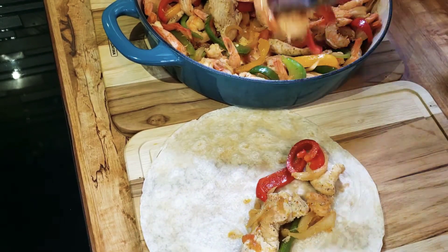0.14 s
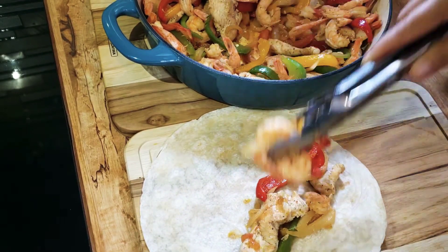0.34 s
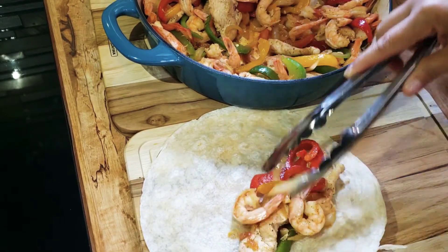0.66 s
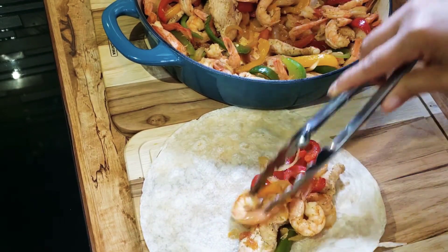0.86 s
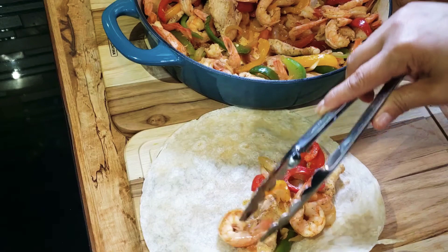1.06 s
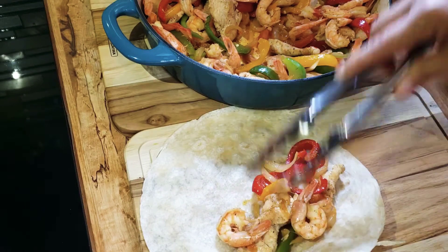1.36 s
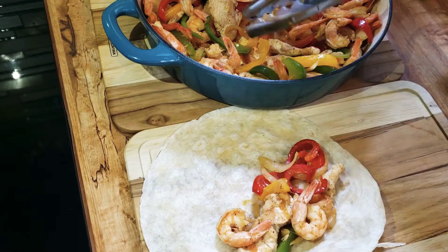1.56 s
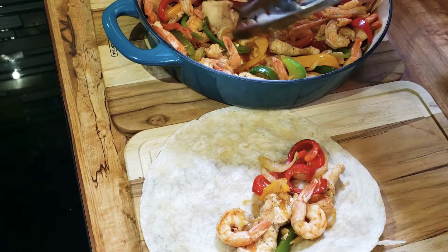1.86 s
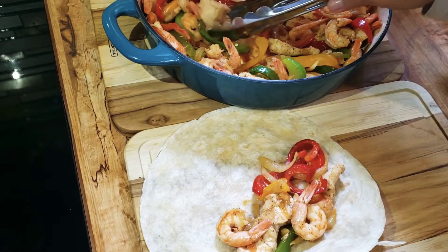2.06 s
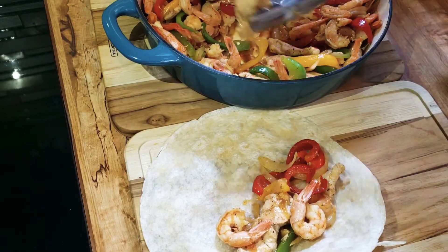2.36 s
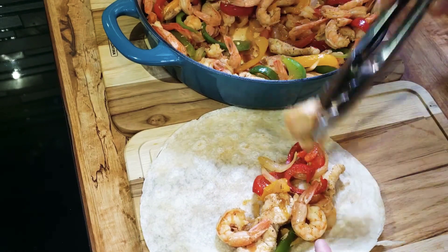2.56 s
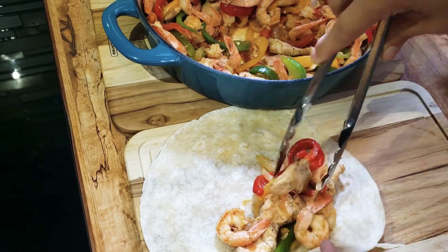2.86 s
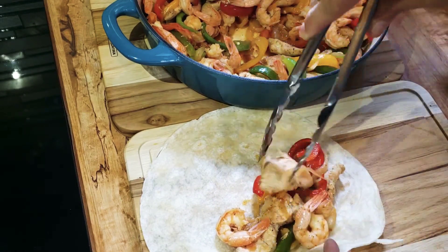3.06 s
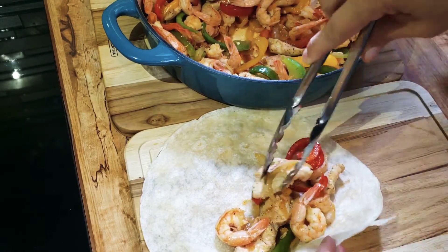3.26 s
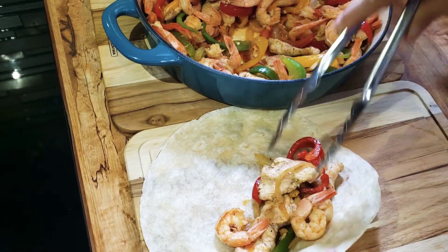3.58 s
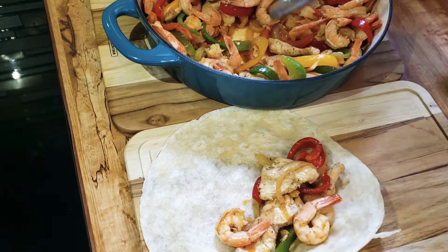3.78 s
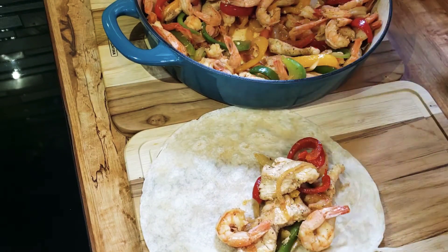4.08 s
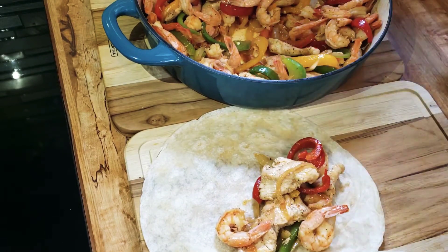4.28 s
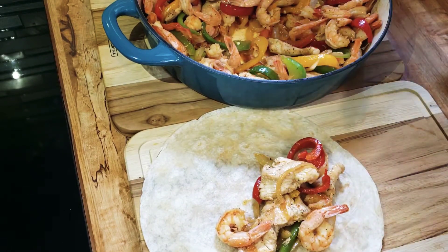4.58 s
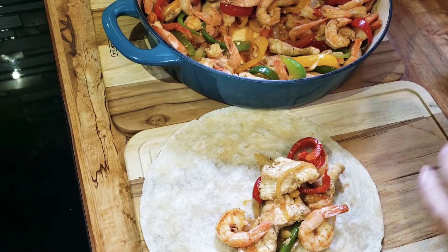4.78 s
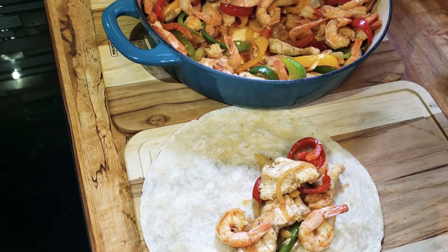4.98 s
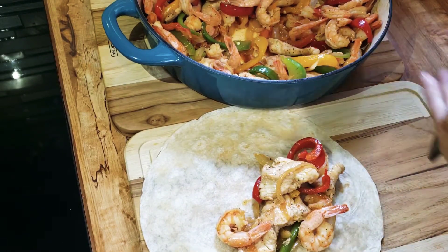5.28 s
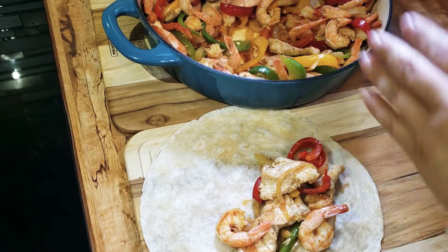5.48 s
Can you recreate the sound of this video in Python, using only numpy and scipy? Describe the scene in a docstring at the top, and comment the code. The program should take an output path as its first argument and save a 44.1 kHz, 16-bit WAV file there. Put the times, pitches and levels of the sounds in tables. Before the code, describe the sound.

Metal serving tongs in a quiet home kitchen. A tight click near 0.6 seconds, faint taps around one, two and three seconds, then from four seconds a loud bright clatter as the tongs are put down, with rattles continuing to the end. Low appliance rumble and slight hiss underneath. Close stereo microphone, steel louder on the right, short room tail.

```python
"""Quiet kitchen: steel tongs click, rattle and are laid down, louder on the right. Steel: decaying modes plus
shaped noise, repeated by random rebounds; echoes add a short tail. Pats and knocks: band-limited noise bursts,
faint or strong: soft pats of food, dull knocks of the board. Background: rumble and hiss from random spectra,
motor tones from wavering sines. Gain control ducks everything after loud clicks."""
import sys
import numpy as np
from scipy import signal
from scipy.fft import rfft, irfft
from scipy.io import wavfile
from scipy.ndimage import uniform_filter1d

SR = 44100
rng = np.random.default_rng(int(sys.argv[2]) if len(sys.argv) > 2 else 0)


def to_wav(sig):
    """Store sig (one row per channel, or 1-D mono) as 16-bit WAV at the path in sys.argv[1].

    Samples outside -1..1 are clipped; the rate is SR.
    """
    pcm = np.clip(np.atleast_2d(sig), -1, 1) * 32767
    pcm = np.round(pcm).astype(np.int16)
    wavfile.write(sys.argv[1], SR, pcm.T)  # frames by channels


N = 248724

# Rumble and hiss spectrum: f/Hz, relative density/dB
AIR_SPECTRUM = [(15, -26), (30, -17.5), (75, -7.5), (88, -6.5), (105, -17), (180, -14.5), (230, -24.5),
                (330, -17.5), (390, -12), (450, -19), (560, -21), (1150, -34), (2660, -35), (7500, -39),
                (13000, -34), (15800, -30.5), (16000, -73)]
# Left-right likeness of the air: f/Hz, correlation (clipped to +-1)
AIR_LIKENESS = [(60, 0.53), (130, 0.5), (290, 0.8), (640, 0.21), (1410, -0.2), (3100, 0.1), (6820, 0),
                (15000, -0.8)]
# Balance of the air: f/Hz, left minus right/dB
AIR_BALANCE = [(60, -8), (110, -1.5), (200, -8), (380, -9.5), (700, -6), (1290, -0.5), (2380, -0.5),
               (4400, 0.5), (8120, 0.0), (15000, -5.5)]
# Chance unevenness of the low rumble noise: t/s, gain/dB (full at 0 Hz, fading upward)
RUMBLE_UNEVENNESS = [(0, -2.7), (.5, -.5), (1, 0.1), (1.5, 4.5), (2, -1.4), (2.5, 2.5), (2.85, 1.2),
                     (3.3, 1.5), (3.8, 0), (4.3, 0.8), (4.8, -2.5), (5.2, -2), (5.64, 3.5)]
# Steady appliance tones: f/Hz, level before waver/dB rms, left minus right/dB, left lead/rad
HUM_TONES = [(58.7, -69, -3, 0.081), (82.5, -62.5, -4, .1), (237.6, -86, -4.5, .3), (269, -88, -3.5, 1),
             (2600, -96, -1, .1)]
# One tone that comes and goes: t/s, level before waver/dB rms
WHINE_LEVEL = [(0.0, -79), (0.14, -74.5), (0.74, -84), (1.96, -70), (3.08, -81.5), (3.12, -91), (3.19, -76),
               (4.08, -76), (4.18, -81), (5.04, -87.5), (5.2, -76), (5.64, -76)]
# Short broad noise bursts, faint or strong: pats of food and dull knocks of the board under the tongs: t/s,
# drive/dB, centre f/Hz, half width/octaves, rise/s
PATS_AND_KNOCKS = [(.168, -59, 11500, 0.22, .004), (.3, -63.5, 4300, 0.42, .03), (.72, -56, 5300, 0.42, 0.033),
                   (1.06, -61, 5000, 0.74, 0.043), (1.619, -62.5, 4500, 0.28, 0.023),
                   (2.06, -57, 5500, .2, .015), (2.13, -59, 5500, 0.63, 0.054), (2.18, -72, 6000, .4, 0.0074),
                   (2.4, -61, 5000, 0.66, .006), (2.5, -61, 4500, 0.34, 0.025), (2.76, -50, 1200, 1, 0.015),
                   (2.769, -57.5, 12100, 0.35, 0.018), (2.78, -56.5, 5500, 0.38, 0.013),
                   (3.05, -60, 4500, 0.59, 0.026), (3.38, -60.5, 4500, 0.42, 0.023),
                   (3.66, -58.5, 5000, .3, .02), (3.82, -57, 5450, .3, 0.024), (4.208, -40, 925.9, 0.56, 0.011),
                   (4.28, -45, 900, 0.63, 0.0078), (4.7, -47, 1400, 1, .012), (5.18, -40.5, 4860, 0.62, 0.046),
                   (4.5, -67, 925.9, 0.54, 0.015), (5.352, -33, 7900, 0.98, 0.01),
                   (5.46, -36.5, 2530, 0.21, 0.016), (5.61, -52, 6000, 0.59, .02)]
# Kitchen decay: f/Hz, t60/s
KITCHEN_T60 = [(1500, 0.3), (3000, 0.28), (6000, 0.23), (9000, 0.16), (12000, 0.19), (15700, 0.046),
               (16100, .03)]
# Touches of the tongs: t/s, drive/dB, tips/dB, hinge end/dB, knock of the thing touched/dB,
# low mode woken most f/Hz, high mode woken most f/Hz, left minus right before shadow/dB,
# fizz fade/(dB per 10 ms), rebounds at t = 0/dB
TOUCHES = [(0.6252, -30.5, -13, -34, -45, 6650, 12400, -4.0, 7, -12),
           (0.6323, -27.5, -14.5, -35.5, -39, 6500, 12100, -9, 10, -7.5),
           (0.6495, -29, -16, -29.5, -38, 6400, 12000, -6, 8.4, -2),
           (0.775, -53, -22, -20, -28, 6230, 14300, -8, 7, -5),
           (0.8, -55.5, -21, -19, -27, 6490, 12400, -7, 7, -7),
           (1.0302, -50.5, -14, -19, -23.5, 6600, 13300, -10, 3.6, 6.5),
           (1.039, -44.5, -14, -27, -25, 4480, 11300, -11, 3.4, -7),
           (1.209, -45, -24, -39, -39, 4500, 9630, -10, 3.1, -5),
           (2.0971, -40.5, -22.5, -41, -42, 6300, 11400, -8, 3.9, -10),
           (2.1197, -61, -7, -25, -19, 6800, 10600, -15, 5.4, 0),
           (2.2811, -47, -11, -27, -26, 6200, 11700, -14, 4.6, 0),
           (2.289, -39.5, -9.5, -26, -26, 4930, 12200, -11, 3.7, 0.5),
           (2.3112, -36, -13.5, -21.5, -26, 6400, 11800, -7.5, 8.8, -11),
           (2.951, -40, -10, -28, -30.5, 5900, 11200, -11.5, 7, -3),
           (2.9712, -49.5, -11, -20, -22, 4840, 11900, -14, 4.9, 2),
           (3.6312, -53, -6, -23, -34, 4700, 9820, -7.5, 4.5, -2),
           (3.8993, -53.5, -12, -29, -28, 5590, 11300, -10, 3.4, -4),
           (4.0036, -24.5, -10.5, -31, -40, 4320, 11400, -8.5, 7.3, -1.5),
           (4.0267, -54, -15, -11, -35, 4520, 11400, -7, 7, -9),
           (4.1095, -31.5, -19.5, -35, -42, 4100, 10400, -9, 5.6, -16),
           (4.1625, -46.5, -19.5, -29, -46, 6000, 11500, -7.0, 3.6, 8),
           (4.2096, -14, -6.5, -20, -64, 4730, 11800, -10, 8.1, -12),
           (4.2122, -16, -13, -23, -43, 5940, 11800, -7.5, 9.6, -7),
           (4.2215, -20.5, -3, -29, -45, 4700, 11800, -10, 10, -14),
           (4.2767, -19, -6.5, -32, -44, 4660, 11300, -7.5, 11.4, -10),
           (4.2868, -45, -20, -27, -39, 4840, 11300, -12, 7, -13),
           (4.343, -25.5, -14.5, -35, -46, 5730, 11400, -8, 8.3, -12),
           (4.4066, -31, -7.5, -36, -37, 4370, 11800, -5, 4.2, -7),
           (4.4186, -36, -8.5, -29, -43, 4310, 11300, -18.5, 4.6, -9.5),
           (4.4315, -31.5, -9, -19, -37, 4350, 11900, -10, 2.7, 7.5),
           (4.4495, -23.5, -10, -28, -38, 6300, 11900, -9.5, 7, -11.5),
           (4.464, -35, -15.5, -23, -36, 4410, 11400, -13, 7.6, 1),
           (4.546, -24.5, -8.5, -31, -62, 6620, 10400, -10.5, 9, -16.5),
           (4.549, -26, -15, -26, -49, 6500, 11300, -13, 7, -21),
           (4.575, -34.5, -13.5, -25, -38, 6430, 11300, -10.5, 2.6, -13),
           (4.6626, -38.5, -4, -34, -53, 6140, 11600, -10.5, 2.7, -7),
           (4.6961, -24.5, -1.5, -47, -61, 5730, 11500, -15, 15, -14),
           (4.7015, -26, -1.5, -36, -42, 5360, 11500, -10.5, 4.4, -11),
           (4.7213, -23, -11.5, -23.5, -41, 6530, 11700, -6.5, 12, -7),
           (5.0533, -35, -12.5, -37, -42, 6790, 11500, -8.5, 3.6, -1.5),
           (5.1006, -38, -14, -25, -40, 5940, 11500, -14, 5.5, -13),
           (5.1074, -28.5, -13.5, -34, -41, 6100, 11200, -3.5, 9.3, -10),
           (5.1143, -38.5, -6, -37, -45, 6010, 11300, -8, 7, -17),
           (5.1679, -29.5, -5, -28, -53, 6020, 11500, -8.5, 5.5, -3),
           (5.218, -37, -7, -42, -48, 3990, 12700, -8, 3.5, -13),
           (5.2425, -33, -7.5, -28, -46, 7350, 14300, -10.5, 3.9, -8),
           (5.252, -25.5, -3.5, -35, -30.5, 7150, 11500, -6.0, 8.4, -13),
           (5.3644, -26.5, -8, -37, -37, 6080, 11300, -10, 8.1, -4),
           (5.3698, -27.5, -16, -27, -37, 6270, 11500, -13.5, 7.4, -4),
           (5.462, -18.5, -13, -29, -36.5, 6300, 11300, -9, 12.4, -9),
           (5.4711, -22.5, -16.5, -24, -40, 5330, 11700, -1.5, 7.9, -6)]
# Modes of the steel arms: f/Hz, level before scatter/dB, t60 before hand damping/s
STEEL_MODES = [(2190, 2, 0.053), (3176, 5.5, 0.068), (3754, 6, 0.15), (4300, 9, 0.057), (4750, 2, 0.099),
               (4780, 0, 0.07), (5280, 3, 0.074), (5873, 3, 0.054), (6000, -11, 0.11), (6570, 1.5, 0.047),
               (6910, -1.5, 0.075), (7530, -2.5, 0.066), (7630, 0.5, 0.27), (7560, -7, 0.034),
               (8550, -3, 0.096), (9270, -3.5, 0.034), (10270, 3, 0.21), (11020, 1, .09),
               (11300, -11.5, 0.14), (11200, 2, 0.16), (11500, -8, 0.03), (11600, 1, 0.03),
               (11800, 7.5, 0.033), (13300, -5.5, .12), (12980, -12, .07), (12640, 6, 0.13),
               (13700, 4.5, 0.023), (14300, -1.5, 0.05), (15000, -12.5, .09), (15200, 4, 0.032)]
# Relative level of the knock, hinge end, middle and tips, with the top of the band
# closed at 16 kHz: f/Hz, level/dB
KNOCK_LEVEL = [(600, -22), (1500, 3.5), (2200, 3.5)]
HINGE_LEVEL = [(2700, 0), (3150, 2.5)]
MIDDLE_LEVEL = [(3700, -26.5), (4500, -22), (5250, -22), (6600, -17.5), (8000, -20)]
TIPS_LEVEL = [(9200, -5.5), (11800, -7), (14600, -8), (15800, -5.5), (16050, -33)]
# Boost around the low, then the high mode woken most: level/dB, half width/octaves
LANDING_BOOST = [(7, 0.14), (3.5, 0.058)]
# Extra gain of the left channel on tongs: f/Hz, gain/dB
LEFT_SHADOW = [(2000, -6), (4000, -2), (8000, -3.5), (12000, -7.5), (14000, -21.5), (16000, -2.5)]

AIR_DB_RMS = -65.5
WHINE_HZ, WHINE_PAN_DB, WHINE_LEAD_RAD = 495.8, -9.5, 0.95
WAVER_DB_RMS, WANDER_RAD_RMS = 1.6, 0.69
RING_DB, RING_DB_PER_DB, USUAL_DRIVE_DB = -17.5, 0.08, -33  # harder touches ring clearer
REBOUNDS_PER_S, THINNING_DB_PER_S = 350, 600
LEAD_IN = 64  # samples ahead of each touch
EDGE_HZ = 16800


def gain_of(db):
    """Decibels to amplitude factor."""
    return 10 ** (np.asarray(db) / 20)


def evened(x):
    """Scale to rms 1."""
    return x / np.sqrt(np.mean(x ** 2) + 1e-20)


def read(points, hz):
    """Interpolate a table on a log-frequency axis."""
    f, value = np.transpose(points)
    return np.interp(np.log(hz + 1), np.log(f + 1), value)


def bell(hz, centre_hz, octaves):
    """Gaussian weight on a log-frequency axis."""
    return np.exp(-.5 * (np.log2((hz + 1) / centre_hz) / octaves) ** 2)


def add(mix, s, sound):
    """Mix a sound in at second s."""
    part = mix[:, round(s * SR):][:, :sound.shape[1]]
    part += sound[:, :part.shape[1]]


def drift(t, top_hz):
    """Slow random curve, rms 1: sines of random phase, the slower the larger."""
    freqs_hz = np.geomspace(.3, top_hz, 20)
    return evened(sum(np.sin(2 * np.pi * (f * t + rng.random())) / np.sqrt(f) for f in freqs_hz))


def air():
    """Appliance rumble and microphone hiss: random short-time spectra, partly shared by the channels."""
    frames, hz = N // 512 + 5, np.fft.rfftfreq(2048, 1 / SR)
    a, b, c, d, patches = rng.standard_normal((frames, 1025, 5)).T
    patches = uniform_filter1d(patches, 12, 0)  # along frequency
    patches = evened(uniform_filter1d(patches, 10, 1))  # along time
    likeness = np.clip(read(AIR_LIKENESS, hz), -1, 1)[:, None]
    left = a + 1j * b
    right = likeness * left + np.sqrt(1 - likeness ** 2) * (c + 1j * d)
    uneven_db = np.interp(np.arange(frames) * 512 / SR, *np.transpose(RUMBLE_UNEVENNESS))
    uneven_db = uneven_db * np.exp(-(hz[:, None] / 720) ** 2)
    balance_db = np.array([.5, -.5])[:, None, None] * read(AIR_BALANCE, hz)[:, None]
    level_db = read(AIR_SPECTRUM, hz)[:, None] + balance_db + 0.77 * patches + uneven_db
    spectra = np.array([left, right]) * gain_of(level_db)
    noise = signal.istft(spectra, nperseg=2048, noverlap=1536)[1][:, :N]
    return gain_of(AIR_DB_RMS) * evened(noise)


def hum():
    """Motor tones: sines wavering in level and a little in pitch."""
    t, out = np.arange(N) / SR, np.zeros((2, N))
    coarse = t[::256]
    whine_db = np.interp(t, *np.transpose(WHINE_LEVEL))
    for hz, db, pan_db, lead_rad in HUM_TONES + [(WHINE_HZ, whine_db, WHINE_PAN_DB, WHINE_LEAD_RAD)]:
        level_db = db + WAVER_DB_RMS * np.interp(t, coarse, drift(coarse, 10.0))
        phase = 2 * np.pi * hz * t + WANDER_RAD_RMS * np.interp(t, coarse, drift(coarse, 2.0))
        gain = np.sqrt(2) * gain_of(level_db + [[pan_db / 2], [-pan_db / 2]])
        out += gain * np.sin(phase + [[lead_rad], [0]])
    return out


def pats_and_knocks():
    """Short broad unpitched noise bursts, pats of food and dull knocks of the board: each swells, then dies
    exponentially."""
    t, hz, out = np.arange(8192) / SR, np.fft.rfftfreq(8192, 1 / SR), np.zeros((2, N))
    for s, db, centre_hz, octaves, rise_s in PATS_AND_KNOCKS:
        puff = rng.standard_normal((2, len(t))) * t / rise_s * np.exp(-t / rise_s)
        band = bell(hz, centre_hz, octaves) * (hz < 15800)
        gain = gain_of(db + np.array([[-2.5], [2.5]]))
        add(out, s, gain * irfft(rfft(puff) * band))
    return out


def kitchen(x):
    """Sparse echoes of random sign, each band dying at its own speed; three tails take turns."""
    out, turn = np.zeros((2, N)), 2 * np.pi * 7.3 * np.arange(N) / SR
    for k in range(3):
        taps = np.zeros((2, SR // 2))
        at = np.arange(120, SR // 2 - 20, 20) + rng.integers(0, 20, (2, (SR // 2 - 121) // 20))
        np.put_along_axis(taps, at, rng.choice([-1., 1.], at.shape), 1)
        hz, t, spectra = signal.stft(taps, SR, nperseg=256)
        decay = gain_of(-60 * t / read(KITCHEN_T60, hz)[:, None])
        tail = signal.istft(spectra * decay, SR, nperseg=256)[1]
        tail = tail / np.linalg.norm(tail[0])
        share = np.sqrt(2 / 3) * np.cos(turn + k * np.pi / 3)
        out += signal.fftconvolve((x * share)[None], tail, axes=1)[:, :N]
    return out


def tongs():
    """Each touch: modes ring by where it lands, noise cracks and fizzes, rebounds repeat both."""
    t, hz = np.arange(4096) / SR, np.fft.rfftfreq(8192, 1 / SR)
    mode_hz, mode_db, t60_s = np.transpose(STEEL_MODES)
    near = (hz[::2, None] - mode_hz) / 220
    ending = np.cos(np.pi / 2 * t / t[-1])
    delay = np.exp(-2j * np.pi * hz * LEAD_IN / SR)
    out = np.zeros((2, N))
    for (s, drive_db, tips_db, hinge_db, knock_db, low_hz, high_hz,
         pan_db, fade_db, rebound_db) in TOUCHES:
        luck = rng.standard_normal((4, len(mode_hz)))
        noise, dice = rng.standard_normal((2, len(t))), rng.random((2, len(t)))

        favoured_db = 3.7 * sum(np.exp(-((mode_hz / f - 1) / 0.049) ** 2) for f in (low_hz, high_hz))
        woken = gain_of(mode_db + 3 * luck[0] + favoured_db)
        # unlisted small modes crowd around the woken ones
        clusters = evened(np.sqrt(.2 + (woken ** 2 / (1 + near ** 2) ** 2).sum(1)))

        bent_hz = mode_hz * (1 + 0.0029 * luck[3])  # the grip bends the arms and shifts the modes
        rings = np.exp((2j * np.pi * bent_hz - np.log(1000) / t60_s)[:, None] * t)
        phase_rad = 3 * luck[1] + [2.6 * luck[2], 0 * t60_s]
        ring_db = RING_DB + RING_DB_PER_DB * (drive_db - USUAL_DRIVE_DB)
        hand_damping = gain_of(-75 * fade_db * t)
        ring = gain_of(ring_db) * ((woken * np.exp(1j * phase_rad)) @ rings).real * hand_damping

        noise[0] = .5 * noise[1] + 1.96 * noise[0]  # left partly follows right
        noise = irfft(rfft(noise) * clusters)
        crack = gain_of(12.5) * np.exp(-t / 0.0023)
        fizz = gain_of(-100 * fade_db * t)
        touch = (ring + noise * (crack + fizz)) * (1 - np.exp(-t / 0.00096)) * ending

        rebounds = gain_of(rebound_db - THINNING_DB_PER_S * t) * dice[0] ** 2
        hits = rebounds * (dice[1] < REBOUNDS_PER_S / SR) + (t == 0)

        place = [(f, db + knock_db) for f, db in KNOCK_LEVEL]
        place += [(f, db + hinge_db) for f, db in HINGE_LEVEL] + MIDDLE_LEVEL
        place += [(f, db + tips_db) for f, db in TIPS_LEVEL]
        landing_db = sum(db * bell(hz, f, octaves)
                         for f, (db, octaves) in zip((low_hz, high_hz), LANDING_BOOST))
        side_db = [read(LEFT_SHADOW, hz) + pan_db / 2, 0 * hz - pan_db / 2]
        colour = gain_of(read(place, hz) + landing_db + side_db)

        chatter = irfft(rfft(touch, 8192) * rfft(hits, 8192) * colour * delay)[:, :6144]
        add(out, s - LEAD_IN / SR, gain_of(drive_db) * chatter)
    return out


def scene():
    """Air, hum, pats and knocks under the tongs, dry and in the room."""
    steel = tongs()
    steel[0] = np.roll(steel[0], 7)  # samples: the left microphone is farther away
    room = gain_of([[-12], [-9]]) * kitchen(steel[1])
    return air() + hum() + pats_and_knocks() + room + steel


def record(dry):
    """Gain control: smoothed excess of recent power over -41 dB lowers the level; then a low-pass."""
    keep = np.exp(-1 / (.15 * SR))
    power = signal.lfilter([1 - keep], [1, -keep], (dry ** 2).mean(0))
    power_db = 10 * np.log10(power + 1e-12)
    lag = np.exp(-1 / (.35 * SR))
    over_db = signal.lfilter([1 - lag], [1, -lag], np.maximum(power_db + 41, 0))
    ducked = dry / gain_of(0.68 * over_db)
    low_pass = signal.firwin(511, EDGE_HZ, window=("kaiser", 9), fs=SR)
    return signal.oaconvolve(ducked, low_pass[None], "same")


dry = scene()
out = record(dry)
to_wav(out)
```